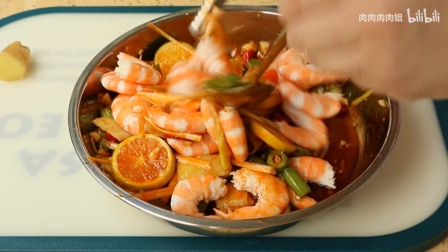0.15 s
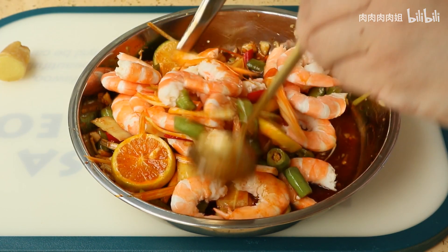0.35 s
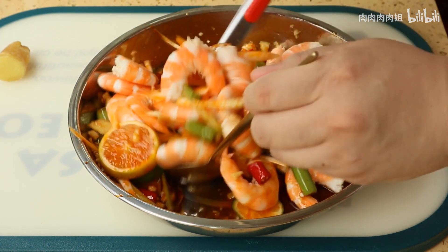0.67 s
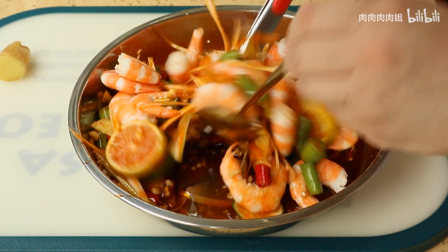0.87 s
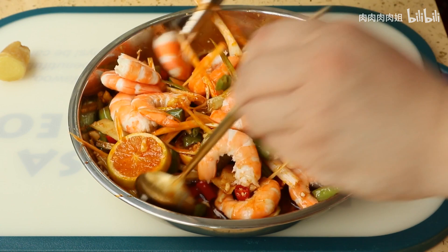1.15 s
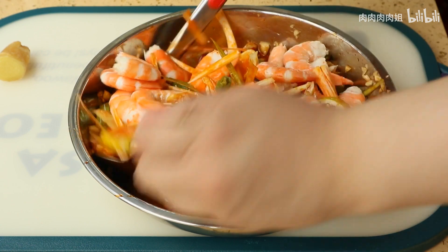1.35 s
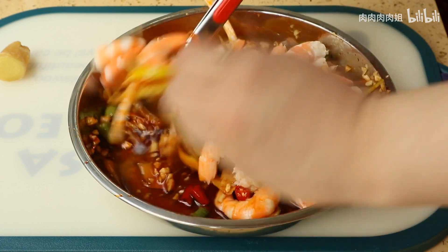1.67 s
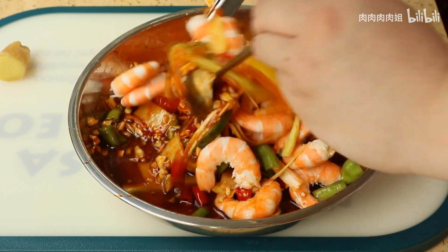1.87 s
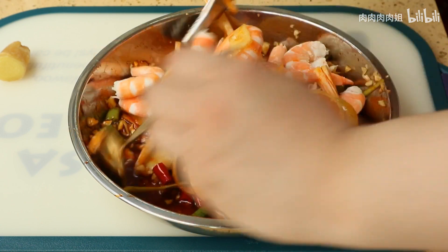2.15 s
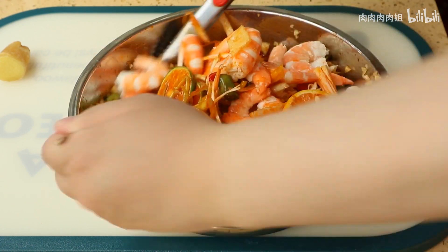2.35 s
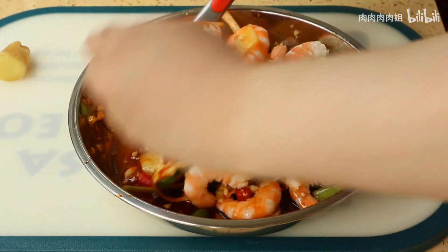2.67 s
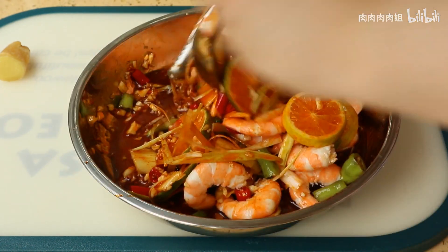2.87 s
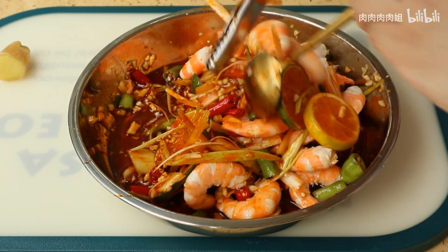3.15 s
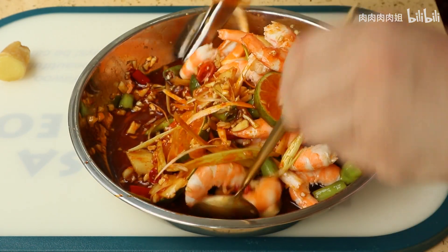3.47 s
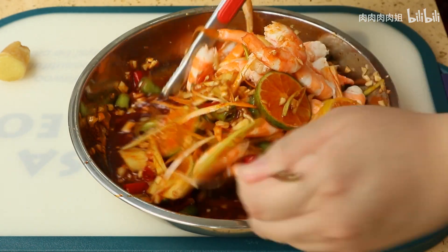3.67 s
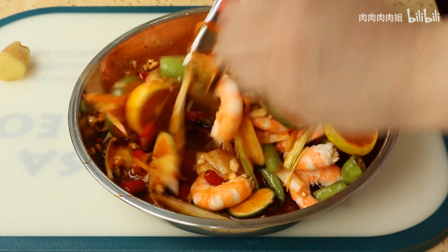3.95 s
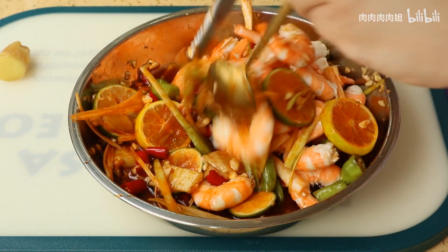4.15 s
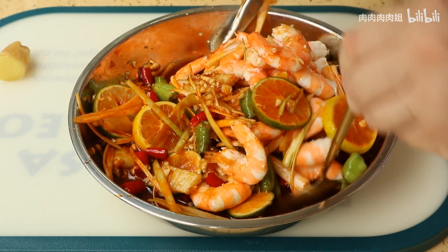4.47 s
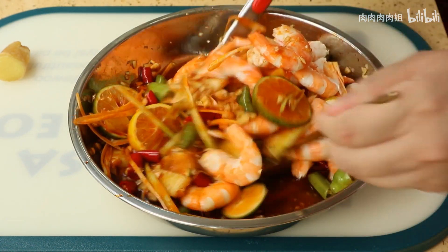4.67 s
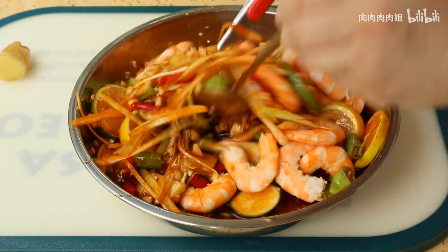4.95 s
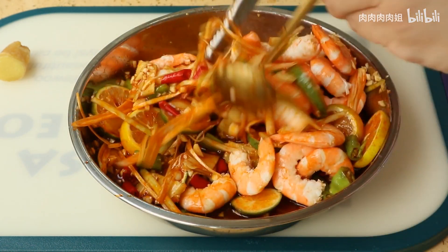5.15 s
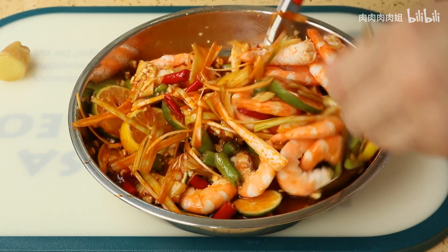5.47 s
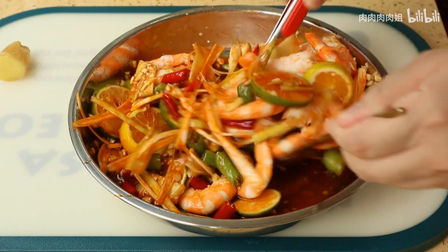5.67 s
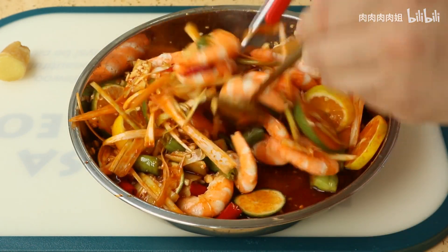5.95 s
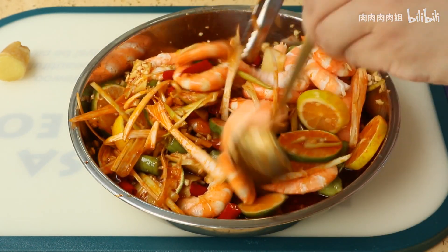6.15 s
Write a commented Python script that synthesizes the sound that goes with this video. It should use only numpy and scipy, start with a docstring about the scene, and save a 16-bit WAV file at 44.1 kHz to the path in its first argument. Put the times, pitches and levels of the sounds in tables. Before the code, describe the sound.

Very close stereo sound of shrimp tossed in sauce in a steel bowl on a plastic board, in a small, short-echoing kitchen. A dull low rush runs throughout, with a faint motor hum that wavers, nearly vanishes around 4 seconds, then returns lower. At the start the spoon drags dully through food and tongs tick. Spoon clanks come at about 0.5, 1.2 (loudest and brightest), 2.3, 3.5, 4.5 and 5.4 seconds, some doubled; the last is a softer clatter with a small tap at 5.7. Each is followed within a tenth of a second by the bowl knocking onto the board, strong at 3.6 and faint at 2.4. Rings are short, damped by food. Wet crackle and little popping smacks swell with each scoop, strongest near 4.6. Tongs touch lightly between strokes, notably at 2.1-2.2, 4.6-5.1 and 5.8. After the loudest blow the level dips and creeps back.

```python
"""In a small kitchen, shrimp salad is tossed in a steel bowl on a plastic board. Low rush and hum are shaped
noise and two sine waves; the sauce squelches in tiny random snaps and pitched pops between the strokes.
Tongs tick; about once a second a spoon clanks into the wall and the bowl rocks back onto the board.
These metal sounds are ringing modes plus short noise bursts. Near walls and the room answer;
the recorder's gain control turns loud blows down and lets the level creep back."""
import sys
import numpy as np
from scipy import signal
from scipy.fft import rfft, irfft, next_fast_len
from scipy.io import wavfile
from scipy.ndimage import uniform_filter1d, map_coordinates

SR = 44100
rng = np.random.default_rng(int(sys.argv[2]) if len(sys.argv) > 2 else 0)


def file_out(sig):
    """Save sig as 16-bit WAV at sys.argv[1]."""
    # one column per channel
    cols = np.atleast_2d(sig).T
    # limit, then scale
    lim = np.clip(cols, -1, 1)
    pcm = np.round(lim * 32767).astype(np.int16)
    wavfile.write(sys.argv[1], SR, pcm)


N = 278271  # length of the scene in samples
BLOW = np.arange(112 ** 2) / SR  # time axis of one blow, in seconds


def amp(db):
    """Turn decibels into gain."""
    return 10 ** (np.asarray(db) / 20)


def unit(x):
    """Scale to rms 1."""
    return x / np.sqrt(np.mean(x ** 2) + 1e-20)


def along(points, hz):
    """Read (pitch_hz, value) points as a curve over log frequency."""
    f, v = np.transpose(points)
    return np.interp(np.log(hz + 1), np.log(f + 1), v)


def curves(rows):
    """Give one value per sample for each column after the time."""
    s, *cols = np.transpose(rows)
    return [np.interp(np.arange(N) / SR, s, c) for c in cols]


def wobble(rate):
    """Draw a smooth random curve with `rate` random knots a second."""
    coarse = np.arange(0, N + 64, 64)
    knots = rng.standard_normal(int(N * rate / SR) + 4)
    smooth = map_coordinates(knots, [coarse * rate / SR])
    return np.interp(np.arange(N), coarse, smooth)


def filtered(x, response):
    """Multiply the spectrum of x by a response to frequency."""
    m = next_fast_len(x.shape[-1] + SR // 20)
    spectrum = rfft(x, m) * response(np.fft.rfftfreq(m, 1 / SR))
    return irfft(spectrum, m)[..., :x.shape[-1]]


def coloured(pair, spectrum, alike):
    """Mix two unrelated signals into stereo of rms 1 with a given spectrum and left-right likeness."""
    def response(hz):
        turn = np.arccos(np.clip(along(alike, hz), -1, 1)) / 2
        return amp(along(spectrum, hz)) * [np.cos(turn), np.sin(turn)]

    mid, side = filtered(pair, response)
    return unit(np.array([mid + side, mid - side]))


def fade(t, t60):
    """Fall by 60 dB in t60 seconds."""
    return np.exp(-np.log(1000) * t / t60)


def add(track, s, sound):
    """Mix a sound into a track at s seconds."""
    part = track[:, max(round(s * SR), 0):][:, :sound.shape[1]]
    part += sound[:, :part.shape[1]]


# colour of the rush: pitch_hz, level_db (per Hz, relative)
RUSH_COLOUR = [(12, -38), (20, -10.5), (82, -3), (111, -3), (211, -3.5), (511, -13.5), (674, -13.5),
               (753, -8.5), (1310, -18), (1780, -18), (2100, -23), (2480, -20.5), (5850, -35.5),
               (11100, -53), (15000, -58.5)]
# how alike left and right are in the rush: pitch_hz, likeness (1 = the same)
RUSH_LIKENESS = [(60, 1.0), (180, 0.99), (550, 0.85), (1650, 0.82), (4970, 0.057), (15000, 1)]
# the motor's hum: time_s, pitch_hz, level_db
HUM_PATH = [(0, 85.5, -40.5), (1.1, 85.55, -46.5), (2.2, 88.9, -48), (3, 87.85, -42.5), (4.1, 73.6, -67),
            (5.4, 69.76, -42), (6.3, 74, -67)]
RUSH_DB = -37.5


def background():
    """A steady dull rush, and a motor's hum of two sine waves that wavers and ends lower in pitch."""
    hz, hum_db = curves(HUM_PATH)
    turn = 2 * np.pi * np.cumsum(hz + 1.19 * wobble(9)) / SR
    tones = np.sin(turn) + amp(-6.5) * np.sin(2 * turn)
    hum = amp(hum_db + 0.61 * wobble(11)) * np.sqrt(2) * tones
    rush = coloured(rng.standard_normal((2, N)), RUSH_COLOUR, RUSH_LIKENESS)
    return hum + amp(RUSH_DB) * rush


# how fast the room's answer dies: pitch_hz, fade_s (time to fall 60 dB)
ROOM_FADE = [(150, 0.084), (1000, 0.17), (3000, 0.17), (8000, 0.25), (14000, 0.11)]


def room(x):
    """The kitchen's short answer: a noise tail in which each frequency dies at its own speed."""
    colour = [(100, -0.25), (3000, -0.45), (12000, -0.9)]
    likeness = [(300, 0.99), (2000, 0.95), (6000, 0.3)]
    noise = coloured(rng.standard_normal((2, len(BLOW))), colour, likeness)
    hz, t, z = signal.stft(noise, SR, nperseg=256)
    tail = signal.istft(z * fade(t, along(ROOM_FADE, hz)[:, None]), SR)[1]
    tail = tail / np.linalg.norm(tail[0])
    tail = np.pad(tail, ((0, 0), (round(0.0055 * SR), 0)))  # the answer starts 5.5 ms late
    return signal.fftconvolve(x, tail, axes=1)[:, :N]


# echoes off the counter and walls near by: delay_s, level_db (relative)
WALL_ECHOES = [(.0023, -1), (.0041, -13.5), (.0069, -14.5), (.0098, -14), (.0124, -21.5), (.0153, -4.5)]


def early(x):
    """First echoes off the counter and walls, reaching the left and the right side first in turn."""
    out = np.zeros((2, N + SR))
    for k, (delay, db) in enumerate(WALL_ECHOES):
        for side in range(2):
            lag = round(delay * SR) + (k + side) % 2  # one side is a sample later
            out[side, lag:lag + N] += amp(db) * x[side]
    return out[:, :N]


def snaps(rate, spread_db):
    """Two trains of tiny random impulses, `rate` a second; spread_db sets how unequal their sizes are."""
    happens = rng.random((2, N)) < rate / SR
    sign = rng.choice([-1, 1], (2, N))
    size = amp(spread_db * np.minimum(rng.exponential(size=(2, N)), 4))
    return happens * sign * size


# each scoop lifts food off the wall and the sauce parts: start_s, level_db
SCOOP_TIMES = [(-.2, -59), (.54, -49.5), (1.3, -44), (2.27, -46.5), (3.54, -50), (4.5, -39.5), (5.55, -48)]
LIFT_S, SETTLE_DB_PER_S = 0.15, 71  # the crackle swells, then dies as the food settles
STIR_DB = -56.5  # the crackle that goes on between scoops


def scooping():
    """Loudness of the crackle: every scoop swells and settles over the steady stirring."""
    t = np.arange(N) / SR
    power = amp(STIR_DB) ** 2
    for s, db in SCOOP_TIMES:
        rise = np.clip((t - s) / LIFT_S, 0, 1)
        settling = SETTLE_DB_PER_S * np.maximum(t - s - LIFT_S, 0)
        power = power + (amp(db - settling) * rise) ** 2
    return np.sqrt(power)


# the spoon ploughs through the heap: middle_s, length_s, level_db
PUSH_TIMES = [(0, 0.19, -36), (1.115, 0.26, -44.5), (2.07, 0.19, -40), (2.785, 0.16, -44),
              (3.22, 0.15, -50), (4.216, 0.32, -48), (5.784, 0.1, -55)]
SLIDE_DB = -56.5  # the spoon sliding lightly between pushes


def pushing():
    """Loudness of the drag: it swells and sinks as the spoon speeds up and slows down in every push."""
    t = np.arange(N) / SR
    power = amp(SLIDE_DB) ** 2
    for middle, length, db in PUSH_TIMES:
        swell = np.cos(np.pi * np.clip((t - middle) / length, -.5, .5))
        power = power + (amp(db) * swell) ** 2
    return np.sqrt(power)


POCKETS_PER_S, POCKET_HZ = 55, 2100
POCKET_OCTAVES = .9  # pitches spread this far above and below POCKET_HZ
POCKET_CYCLES = 36  # each pop falls 60 dB in this many cycles


def pockets():
    """Small air pockets open between the wet pieces, each a brief fading sine heard as a pitched smack."""
    count = round(POCKETS_PER_S * N / SR)
    when, pitch, strength = rng.random((count, 3)).T[..., None]
    hz = POCKET_HZ * 2 ** (POCKET_OCTAVES * (2 * pitch - 1))
    t = BLOW[:SR // 20]
    shape = fade(t, POCKET_CYCLES / hz) * (1 - np.exp(-hz * t / 2))
    smacks = strength ** 2 * np.sin(2 * np.pi * hz * t) * shape
    at = (when * N).astype(int) + np.arange(len(t))
    return unit(np.bincount(at.ravel(), smacks.ravel(), N)[:N])


# colour of the parting sauce: pitch_hz, level_db (per Hz, relative)
SAUCE_COLOUR = [(400, -41.5), (1500, 8), (3000, 7.5), (5000, -0.5), (8000, -2.5), (11500, -4.5),
                (14000, -16.5), (16000, -31)]
# colour of the duller drag through the food: pitch_hz, level_db (per Hz, relative)
DRAG_COLOUR = [(300, -5.5), (800, 4.5), (1400, 1.5), (2200, -1.5), (2900, -11.5), (4000, -7.5), (8000, -46)]


def sauce():
    """Sauce films part in a fine crackle with single smacks; the spoon drags with a duller grain."""
    fine = unit(snaps(rate=2500, spread_db=3.5))
    single = unit(snaps(rate=45, spread_db=3))
    crackle = coloured(fine + amp(-9) * single, SAUCE_COLOUR, [(1000, 0.43), (8000, 1.0)])
    wet = scooping() * (amp(3.7 * wobble(22.06)) * crackle + amp(-2) * pockets())
    grain = coloured(snaps(rate=900, spread_db=-0.5), DRAG_COLOUR, [(1000, 0.96), (4000, 0.12)])
    return wet + pushing() * amp(1.4 * wobble(25)) * grain


def burst(spectrum, t60, rise=0.000098):
    """Countless modes dying together, made of noise; the wave takes a moment to spread over the steel."""
    likeness = [(500, 0.99), (2000, 0.96), (4500, 0.26), (9000, 0.69)]
    noise = coloured(rng.standard_normal((2, len(BLOW))), spectrum, likeness)
    return noise * fade(BLOW, t60) * (1 - np.exp(-BLOW / rise))


# the steel's dense, quickly damped modes: pitch_hz, level_db (per Hz, relative)
CLANK_COLOUR = [(60, -25), (170, 0.5), (520, -7.5), (1000, -1), (1300, 0.5), (2000, 4.5), (2800, 0.5),
                (3600, -2.5), (4400, -6), (5600, -21.5), (8000, -26), (12000, -51), (16000, -58)]


def clank(t60):
    """The steel's many dense modes sound together as a short clank."""
    return burst(CLANK_COLOUR, t60)


# the instant of contact: pitch_hz, level_db (per Hz, relative)
CRACK_COLOUR = [(300, -16), (2000, -1.5), (5000, 10), (8000, 3.5), (11500, 2.5), (14000, -9.5),
                (16000, -26)]


def crack(t60):
    """The instant of contact gives a bright crack."""
    return burst(CRACK_COLOUR, t60)


MODE_SCATTER_DB = 1  # random change in each mode's strength
DETUNE = .005  # food shifts every mode a little from blow to blow, as a share of its pitch


def ring(modes, free=1, split=0.008, twin_db=-12, rise=0.0012):
    """Struck modes beat with close twins for a share `free` of their ring time; sides differ in phase."""
    twins = np.array(modes) * [1 + split, 1, 1] + [0, twin_db, 0]
    hz, db, t60 = np.vstack([modes, twins]).T
    hz = hz * (1 + DETUNE * rng.standard_normal(len(hz)))
    size = amp(db + MODE_SCATTER_DB * rng.standard_normal(len(hz)))
    # short waves reach the two ports more out of step
    apart = np.minimum(hz / 7000, .65) * rng.standard_normal((2, len(hz)))
    phase = rng.uniform(0, 2 * np.pi, len(hz)) + apart
    pole = 2j * np.pi * hz - np.log(1000) / (free * t60)
    # each mode's state at the start of a block runs on through that block
    blocks = BLOW.reshape(112, 112)
    starts = (size * np.exp(1j * phase))[:, None] * np.exp(np.outer(blocks[:, 0], pole))
    waves = (starts @ np.exp(np.outer(pole, blocks[0]))).imag.reshape(2, -1)
    return waves * (1 - np.exp(-BLOW / rise)) * np.sqrt(2) / np.linalg.norm(size)


SPOT_OCTAVES = 0.079  # width of a favoured band
BASS_HZ = 430  # below this the board takes the blow


def struck_at(blow, bands, bass_db=0):
    """The struck spot favours or avoids some bands; bass_db raises or lowers the bass through the board."""
    def response(hz):
        lift = bass_db / (1 + (hz / BASS_HZ) ** 4)
        for spot_hz, lift_db in bands:
            octaves = np.log2((hz + 1) / spot_hz)
            lift = lift + lift_db * np.exp(-(octaves / SPOT_OCTAVES) ** 2)
        return amp(lift)

    return filtered(blow, response)


# ringing modes of the tongs: pitch_hz, level_db (relative), fade_s (time to fall 60 dB)
TONG_MODES = [(2730, -2, 0.097), (2815, -8, .11), (3620, -17, .08), (4170, 0, .08), (4266, -5, 0.08),
              (4470, -4, 0.057), (5960, -4, .07), (6350, -8, .06), (7700, -8.5, .07), (8000, 1, 0.12),
              (8040, -4.5, .08), (10450, -20, 0.083)]
# light touches of the tongs (the first row is the fading end of an earlier clink): # start_s, scrape_db,
# ring_db, crack_db, top_hz (soft touches are dull), favoured band (pitch_hz, lift_db)
TONG_TOUCHES = [(.005, -32, -50, -45, 4000, (1700, 6.7)), (.028, -37, -51, -51, 4000, (3500, 10)),
                (.669, -32, -38, -37.5, 4000, (2800, 2)), (1.161, -35, -27, -45, 2960, (2750, 4.8)),
                (1.4217, -56, -60, -37, 9000, (3900, 2)), (1.469, -32.5, -50, -54, 3000, (1800, 6)),
                (1.546, -52, -37, -30.5, 9150, (6300, 3)), (2.0537, -29.5, -25, -38, 3000, (820, 3)),
                (2.187, -45, -25, -26, 12000, (4400, 4.9)), (2.197, -38, -23, -28, 7000, (2780, 2.7)),
                (3.848, -38.5, -32, -58, 3000, (2850, 5)), (3.9913, -48, -53, -34.5, 9000, (2900, 3.4)),
                (4.638, -34, -33, -42, 6000, (4030, 11)), (4.667, -29, -44, -37.5, 4000, (2050, 10)),
                (4.727, -36, -50, -56, 3000, (2150, 10)), (4.815, -29.5, -50, -56, 3000, (600, 9.4)),
                (5.02, -39.5, -48, -50, 3000, (2600, 5.5)), (5.084, -33, -28, -49, 2800, (3000, 6)),
                (5.836, -32, -49, -49, 2980, (1800, 6.6)), (5.857, -40, -50, -51, 3000, (2100, 6))]


def tongs():
    """The thin arms graze the bowl and the spoon; food between them dulls the ring."""
    out = np.zeros((2, N))
    for s, scrape_db, ring_db, crack_db, top_hz, band in TONG_TOUCHES:
        arms = filtered(ring(TONG_MODES), lambda hz: 1 / (1 + (hz / top_hz) ** 4))
        touch = amp(ring_db) * arms
        touch += amp(scrape_db) * clank(t60=0.043)
        touch += amp(crack_db) * crack(t60=0.055)
        add(out, s, struck_at(touch, [band]))
    return out


# bowl struck from below, main mode first (each landing sets its pitch):
# pitch_hz, level_db (relative), fade_s (time to fall 60 dB)
FOOT_MODES = [(812, 4.5, 0.096), (141, -9, 0.14), (174, -3.5, 0.12), (223.6, -4, 0.14), (279, -7.5, 0.092),
              (642, -7.5, 0.22), (746, -2, 0.16), (1188, -14, 0.21), (1287, -8.5, 0.078),
              (1492, 0.5, 0.098), (1560, 0.5, 0.084), (1654, -7, 0.11), (1731, -6.5, 0.19),
              (2840, -6.5, .22), (4650, 0, 0.052)]
# the bowl's foot landing on the board: start_s, clank_db, thud_db, crack_db,
# main_mode_hz, band the spot favours or avoids (pitch_hz, lift_db), bass_db
FOOT_LANDINGS = [(0.5811, -17.5, -14.5, -21, 820, (1630, 2.7), 1), (1.2981, -15, -16.5, -23, 814, (1500, 7),
                 5), (2.377, -28, -40, -31, 817, (1630, 16), -16),
                 (3.5746, -13.5, -11, -15, 819, (4800, 4.3), -2), (4.571, -19, -18, -27, 692, (1670, -12),
                 3), (5.547, -19, -24, -26, 634, (2800, 2.5), 4.5)]


def foot():
    """Tipped by the stroke, the bowl drops back on the board and its base rings."""
    out = np.zeros((2, N))
    for s, clank_db, thud_db, crack_db, base_hz, band, bass_db in FOOT_LANDINGS:
        # the main mode shifts with the food lying on the base
        loaded = [(base_hz, *FOOT_MODES[0][1:])] + FOOT_MODES[1:]
        blow = amp(thud_db) * ring(loaded)
        blow += amp(clank_db) * clank(t60=0.067)
        blow += amp(crack_db) * crack(t60=0.059)
        add(out, s, struck_at(blow, [band], bass_db))
    return out


RIM_HZ, RIM_T60_S = 3046, 0.38  # the rolled rim, clear of the food, fades slowest


def rim(rise=.004):
    """One thin, steady note that builds up as the wave runs round the rim."""
    phase = rng.uniform(0, 2 * np.pi) + np.array([[0], [np.pi / 5]])
    note = np.sqrt(2) * np.sin(2 * np.pi * RIM_HZ * BLOW + phase)
    return note * fade(BLOW, RIM_T60_S) * (1 - np.exp(-BLOW / rise))


# ringing modes of the bowl's wall: pitch_hz, level_db (relative), fade_s (time to fall 60 dB, undamped)
BOWL_MODES = [(616, -10, .11), (892, -16, 0.13), (1692, -3.5, 0.14), (1802, -6.5, 0.1), (2153, 1.5, 0.13),
              (2277, -3, 0.1), (2456, -5.5, 0.18), (2570, -5, 0.084), (2760, -5, 0.24), (2825, 5, 0.19),
              (2865, 4, 0.11), (3196, 1.5, 0.15), (3310, -12, 0.081), (3680, 6, 0.09), (3620, -15, 0.11),
              (4030, -4, 0.055), (4440, -12, 0.063), (4730, -5.5, 0.1), (5230, -6, 0.087),
              (6100, -25, 0.14), (6230, -20, 0.16), (7100, -12, .1), (10500, -27, .15)]
# ringing modes of the spoon, lowest first (each clink sets its pitch):
# pitch_hz, level_db (relative), fade_s (time to fall 60 dB, undamped)
SPOON_MODES = [(1210, 0.5, 0.083), (1739, 2.5, 0.058), (3505, -0.5, 0.09), (4005, -9, 0.041),
               (4113, 5, 0.065)]
# spoon on the bowl wall: start_s, clank_db, free (share of the free ring time: a pressed spoon damps),
# spoon_ring_db, bowl_ring_db, rim_note_db, crack_db, lowest_spoon_mode_hz,
# two bands the spot favours or avoids (pitch_hz, lift_db each), bass_db
SPOON_CLINKS = [(.535, -10.5, 0.98, -14, -14, -36, -32, 1215, (2550, 4.7), (1760, -10), 6.5),
                (1.212, -2.5, 0.97, 1.5, -2, -28, -5, 1214, (2500, 2.1), (1800, 2.1), 3.5),
                (2.271, -9, 1.3, -5, -15, -44, -26, 1200, (5470, 13.5), (630, 11), -2),
                (2.3149, -19, 0.75, -14.5, -19.5, -33, -19.5, 1225, (3650, 9.8), (5100, 9.4), -2),
                (3.5346, -9, 0.72, -13, -13.5, -24.5, -26, 1225, (4260, 11), (1180, 4.1), 0),
                (3.563, -23, 0.9, -20, -25, -47, -25, 1170, (9300, 11), (990, 4), 0),
                (4.469, -6.5, 1.09, -5.5, -10.5, -40, -11, 1156, (5260, 8), (1170, 6.2), -10.5),
                (4.536, -12.5, 0.47, -12, -13, -22, -17, 1200, (1700, 9), (1230, -8), -0.5),
                (5.444, -10, 0.63, -17, -16, -46, -34, 1150, (2830, 6.8), (2150, -7), -4.5),
                (5.4564, -18.5, 0.56, -23.5, -25.5, -54, -32.5, 1150, (3100, 7.5), (2150, -1.6), -2.5),
                (5.4718, -19.5, .6, -19, -27, -30, -28.5, 1150, (1690, 8.1), (3200, 9.2), -11),
                (5.4988, -20, 0.5, -35, -31, -54, -31, 1100, (1700, 11), (3200, 3), -2),
                (5.669, -19.5, 0.5, -32, -47, -63, -37.5, 1160, (1400, 2.4), (3550, 6.5), -7)]


def spoon(chatter_s=0.0043, chatter_db=-7, clank_t60=0.078):
    """The spoon hits the wall: a crack, a short clank, and damped ringing; the rim's note fades slowest."""
    out = np.zeros((2, N))
    for (s, clank_db, free, spoon_db, bowl_db, rim_db, crack_db,
         low_hz, band, other_band, bass_db) in SPOON_CLINKS:
        # the lowest mode shifts with where the spoon presses
        held = [(low_hz, *SPOON_MODES[0][1:])] + SPOON_MODES[1:]
        blow = amp(spoon_db) * ring(held, free)
        blow += amp(bowl_db) * ring(BOWL_MODES, free)
        blow += amp(clank_db) * clank(free * clank_t60)
        blow += amp(crack_db) * crack(t60=0.071)
        # the flexing wall swings back into the spoon
        add(blow, chatter_s, amp(clank_db + chatter_db) * clank(free * clank_t60))
        add(out, s, struck_at(blow, [band, other_band], bass_db) + amp(rim_db) * rim())
    return out


def scene():
    """Bowl and utensils close by, in a small noisy kitchen."""
    near = sauce() + tongs() + foot() + spoon()
    return background() + near + amp(-13.5) * early(near) + amp(-9) * room(near)


def gain_control(x, limit_db, release_db, attack, ahead=0.00022):
    """The gain drops quickly as a loud blow arrives and creeps back by release_db a second."""
    power = np.abs(uniform_filter1d(np.mean(x ** 2, axis=0), size=400))
    over = np.maximum(10 * np.log10(power + 1e-12) - limit_db, 0)
    t = np.arange(N) / SR
    early_over = np.interp(t + ahead, t, over)  # looks `ahead` seconds forward
    cut = np.maximum.accumulate(early_over + release_db * t) - release_db * t
    keep = np.exp(-1 / (attack * SR))
    smooth_cut = signal.lfilter([1 - keep], [1, -keep], cut)
    return x * amp(-smooth_cut)


TOP_HZ = 16000  # almost nothing passes above this


def record(dry):
    """Gain control, a rounded ceiling at full scale and the band limit."""
    x = gain_control(dry, limit_db=-13.0, release_db=8, attack=.007)
    x = x / (1 + x ** 6) ** (1 / 6)
    return filtered(x, lambda hz: 1 / (1 + (hz / TOP_HZ) ** 120))


dry = scene()
out = record(dry)
file_out(out)
```